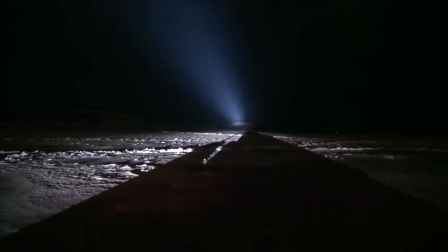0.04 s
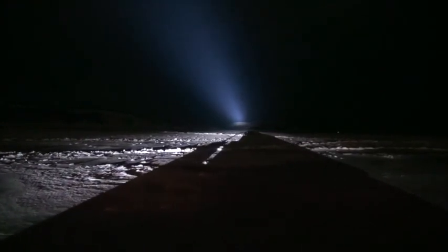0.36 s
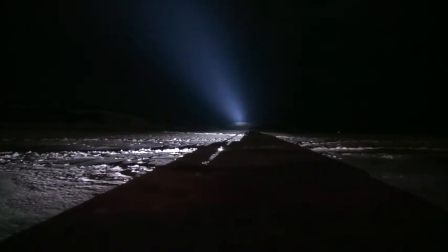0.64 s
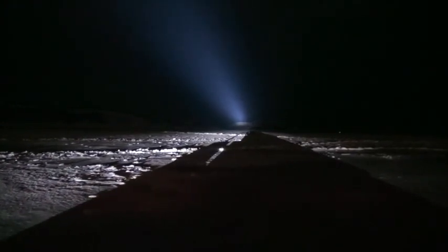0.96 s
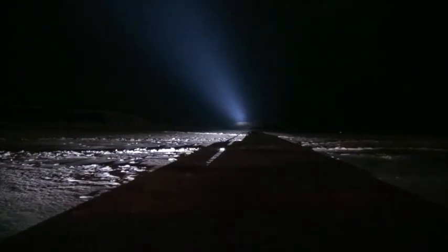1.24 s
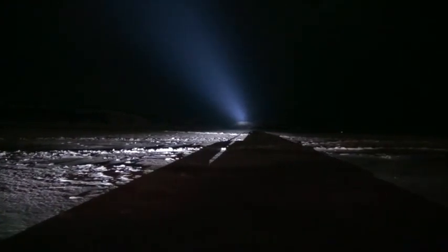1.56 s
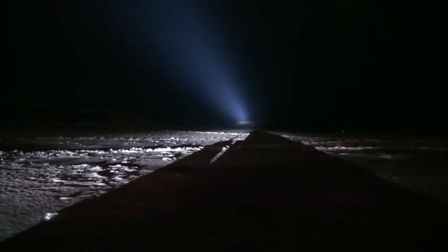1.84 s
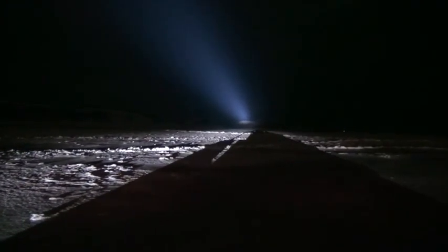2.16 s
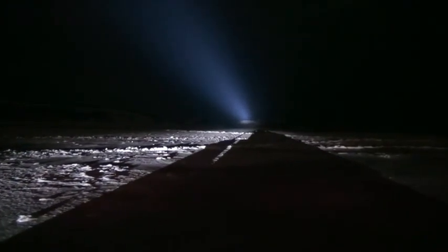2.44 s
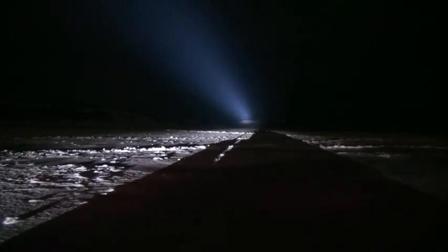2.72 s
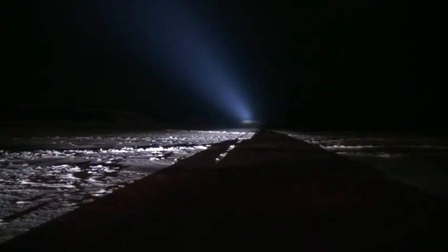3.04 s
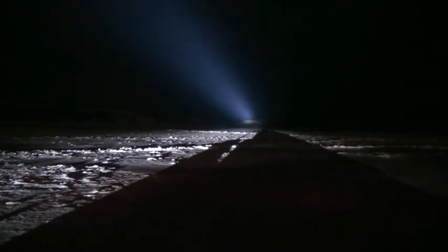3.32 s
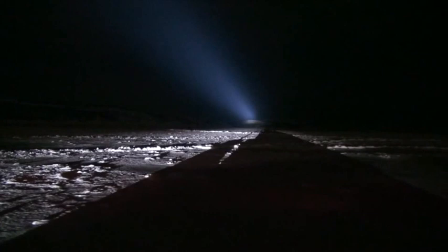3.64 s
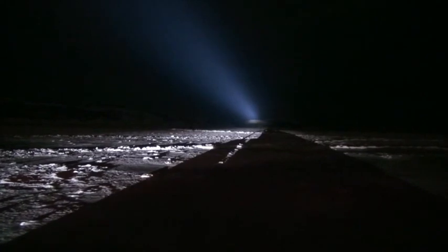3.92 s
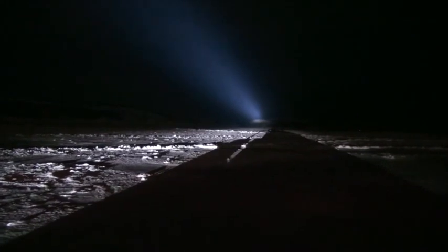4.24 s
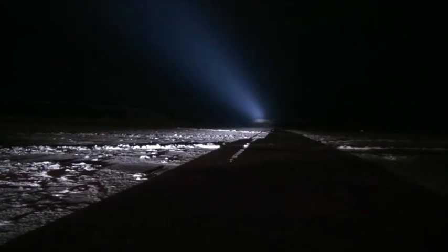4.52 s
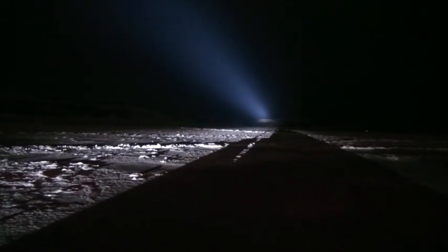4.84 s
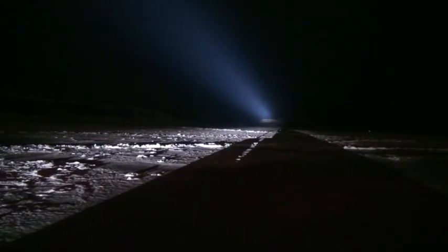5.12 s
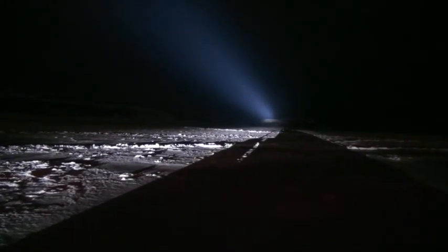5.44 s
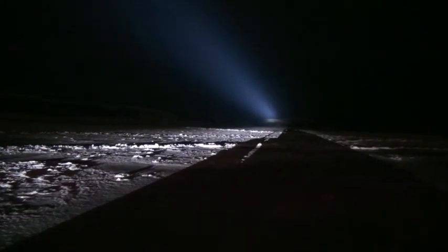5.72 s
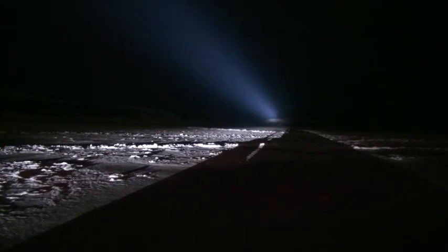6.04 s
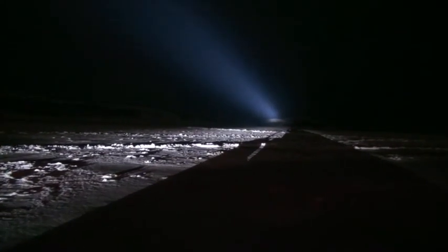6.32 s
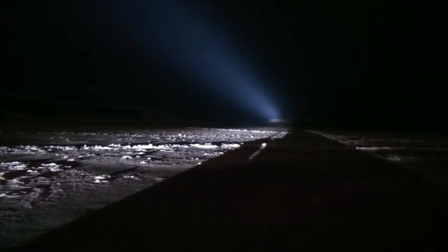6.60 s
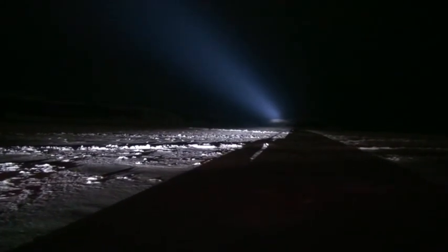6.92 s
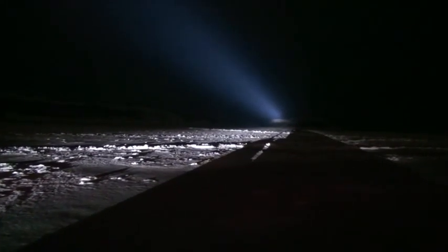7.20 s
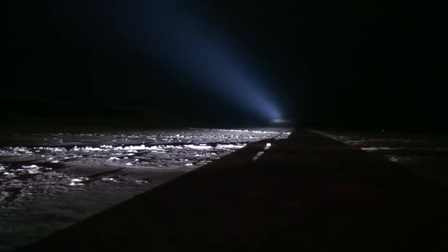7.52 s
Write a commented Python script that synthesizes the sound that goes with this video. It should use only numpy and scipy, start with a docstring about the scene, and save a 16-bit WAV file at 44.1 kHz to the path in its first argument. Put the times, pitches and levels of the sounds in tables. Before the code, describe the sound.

Sea ice grinds, crunches and fizzes against a tug's steel bow, over watery churning and a low, pulsing engine drone.

```python
"""Tug pushing through sea ice

On the front deck at night, the diesel engine hums and throbs about six times a second.
The hull rumbles, gulps and thuds as it rides over floes (slabs of floating ice).
The ice grinds and cracks, and slush hisses along the bow. Brief tones make the grinding bubbly.
The ice and rumble have a hollow colour, and the left side is quieter than the right."""
import sys
import numpy as np
from scipy import signal
from scipy.fft import rfft, irfft, next_fast_len
from scipy.io import wavfile
from scipy.ndimage import uniform_filter1d, minimum_filter1d, map_coordinates

SR = 44100
rng = np.random.default_rng(int(sys.argv[2]) if len(sys.argv) > 2 else 0)


def unload_wav(signal):
    """Save mono or channel-first audio to the path in sys.argv[1] as 16-bit WAV at rate SR, clipped to [-1, 1]."""
    wavfile.write(
        sys.argv[1],
        SR,
        np.round(np.clip(np.atleast_2d(signal).T, -1, 1) * 32767).astype(np.int16),
    )


N = 337806

# Levels in the tables are relative: the functions add their own gain and colour.
# the engine's hum swells with the load (time [s], level [dB])
ENGINE_LOAD = [(0, -27), (.8, -28.5), (3.6, -23), (4.1, -26), (5, -23), (7.66, -26)]
# tones of the exhaust (multiple of the engine's cycle rate, level [dB])
EXHAUST_TONES = [(13, -16.5), (21, 0.5), (22, -9.5), (23, 3), (24, -4.5), (25, -15)]
# deep shudders of the hull (time [s], pitch [Hz], level [dB])
SHUDDERS = [(2.37, 42.3, -26), (3.77, 29, -34)]
# gulps of air and water under the hull (time [s], pitch [Hz], level [dB])
GULPS = [(0.139, 92, -22), (0.28, 77, -20), (0.39, 77, -25), (0.75, 91, -14), (1.57, 96, -19),
         (2.01, 100, -22), (2.14, 82, -17), (2.35, 93, -14), (2.479, 90, -14), (2.56, 91, -22),
         (2.64, 88, -26), (2.77, 90, -25), (2.89, 88, -22), (3.1, 91, -22), (3.3, 94, -21),
         (3.439, 91, -17), (3.64, 82, -18), (3.822, 99, -17), (4.04, 92, -25), (4.14, 81, -18),
         (4.44, 77.5, -27), (4.54, 86, -13), (4.631, 98, -11), (4.751, 87, -18), (4.961, 96, -18),
         (5.15, 86.6, -15), (5.29, 91, -14), (5.55, 96, -23), (5.65, 87, -21), (5.969, 81.5, -19),
         (6.09, 97, -17), (6.73, 85, -19), (6.861, 86, -17), (7.151, 93, -12), (7.3, 84, -17),
         (7.41, 93, -18), (7.56, 88, -22)]
# water churning under the hull (time [s], level [dB])
CHURN = [(0, -34.5), (1.05, -39), (2.45, -33), (3, -39), (3.55, -37), (4.3, -40), (4.7, -34.5), (6, -33.5),
         (6.35, -41.5), (6.75, -33), (7.66, -36)]
# the rumble surges as the hull rides over a floe (start [s], length [s], level [dB])
SURGES = [(0.01, 0.088, -18), (0.185, 0.052, -15), (0.27, 0.042, -12.5), (0.321, 0.099, -19.0),
          (0.462, 0.068, -14), (0.555, 0.087, -12.5), (0.715, 0.18, -19.5), (0.917, 0.105, -16.5),
          (1.414, 0.11, -20.5), (1.536, 0.044, -13.5), (1.573, 0.012, -28), (1.848, 0.057, -19),
          (2.045, 0.12, -19), (2.336, 0.078, -11.5), (2.448, 0.021, -13.5), (2.539, 0.1, -14.5),
          (2.681, 0.1, -17.5), (2.849, 0.081, -21), (3.027, 0.062, -20), (3.185, 0.06, -21.5),
          (3.447, 0.057, -21), (3.63, 0.06, -15.5), (3.717, 0.26, -22.5), (4.012, 0.12, -17),
          (4.265, 0.13, -20.5), (4.418, 0.45, -23), (4.666, 0.065, -14.0), (4.728, 0.15, -18),
          (4.975, 0.074, -12), (5.09, 0.019, -12), (5.168, 0.049, -11), (5.248, 0.076, -21),
          (5.524, 0.087, -20), (5.935, 0.12, -14), (6.481, 0.069, -18.5), (6.662, 0.085, -18),
          (7.135, 0.041, -11), (7.213, 0.096, -16), (7.303, 0.03, -16.5), (7.35, 0.45, -19.5)]
# the bow runs free for a moment (time [s], level change [dB])
LULLS = [(.14, -0.5), (.25, -6.5), (1.16, 1.5), (1.915, -6.5), (2.21, -10.5), (2.32, -2.5), (3.35, -1),
         (4.14, -9), (4.21, 1.5), (4.635, -5.5), (5.465, -5.5), (5.8, -6), (6.2, -3.5), (6.3, -3),
         (7.011, -5)]
# floes bump the steel plates (time [s], thud level [dB], crunch level [dB])
BUMPS = [(.268, -14.5, -12.5), (.616, -13.5, -17), (1.527, -15, -7.5), (1.878, -20, -6),
         (2.239, -10, -13.5), (2.343, -14.5, -12), (2.475, -14.5, -10), (3.652, -20.5, -12),
         (4.268, -10.5, -22), (4.666, -12, -17), (5.497, -13.5, -12.5), (6.661, -17, -17),
         (7.152, -15, -12.5), (7.297, -10, -24)]
# tones the plates ring with (pitch [Hz], level [dB], time to fade by 60 dB [s])
PLATE_TONES = [(176.3, -17, 0.35), (212.6, -3, 0.17), (266, -4, 0.13), (292, -1, 0.092), (315, -1, 0.28),
               (368, -16, 0.072), (442.4, 7.5, 0.11)]
# single cracks in the ice (time [s], level [dB])
CRACKS = [(.294, -23), (.375, -21), (.668, -24), (.745, -23), (.846, -23), (1.156, -20), (1.358, -19),
          (1.526, -21), (1.872, -19), (2.014, -20.5), (2.178, -17), (2.63, -26), (3.359, -23), (3.397, -19),
          (3.795, -22.5), (4.124, -25), (4.333, -24), (4.65, -18), (5.15, -23), (5.661, -21), (6.04, -25),
          (6.355, -20), (6.425, -21), (6.84, -23), (7.134, -14), (7.267, -23), (7.606, -27)]
# how hard the bow presses into the ice (time [s], grinding level [dB])
PRESSURE = [(0, -29), (.7, -28.5), (.93, -28), (1.15, -29.5), (1.88, -27.5), (2.4, -29), (3.75, -29.5),
            (4.1, -29.5), (4.6, -28.5), (5.15, -28), (5.4, -31.5), (6.7, -30.5), (7.1, -28.5), (7.66, -32)]
# how much loose ice lies at the bow (time [s], slush level added to the pressure [dB])
LOOSE_ICE = [(0, -11), (.9, -10.5), (1.25, -8), (1.5, -7.5), (1.8, -10), (3.3, -9), (4.1, -9), (4.6, -9.5),
             (5.15, -9.5), (5.9, -8), (6.4, -6.3), (7.15, -8.5), (7.66, -6.5)]
# the colour, or balance of low and high, of each source (frequency [Hz], level [dB])
WATER_COLOUR = [(20, -37), (32, -26), (44, -18.5), (56, 2), (78, 0.5), (105, 3), (150, 2), (300, -57)]
HULL_COLOUR = [(60, -35), (110, -3.5), (160, 1), (230, 0.5), (320, 0), (450, -4), (560, -9), (660, -25),
               (800, -18), (2500, -61.5)]
SLUSH_COLOUR = [(1500, -18.5), (3300, 10), (4400, 8), (5500, 7.5), (7500, 5), (9000, 1.5), (10200, -2.5),
                (11000, -36)]
BRIEF_TONE_COLOUR = [(480, 4), (620, 4), (760, 3), (900, -1), (1150, -4.5), (1350, -4.5), (1600, -4),
                     (2000, -8.5), (2350, -10.5), (2900, -14.5), (3700, -21)]
GRIND_COLOUR = [(300, -22.5), (450, 2.5), (600, 3.5), (700, 6), (930, -1.5), (1130, -3), (1300, -6),
                (1650, -8), (2000, -10), (2350, -9.5), (2900, -16), (3500, -20.5), (4100, -18.5),
                (7000, -55)]
# passing dips that make the wash hollow (frequency [Hz], depth [dB]; negative is a lift)
HOLLOW_DIPS = [(540, 0.5), (610, 14.5), (690, 52), (810, 37), (870, 4), (950, -6.5), (1420, 1.5), (1510, 6),
               (1620, 24), (1730, 1), (1950, 12), (2150, -7.5), (3700, 7), (3950, 4.5), (4200, 1)]
# flicker of the wash in narrow bands (frequency [Hz], half of the deepest dip [dB])
FLICKER = [(430, 3), (560, 5.5), (1200, 2), (2800, 5), (4200, 3), (5500, 4)]
# fixed narrow peaks and dips give the ice and rumble a hollow colour (frequency [Hz], gain [dB])
HOLLOW_COLOUR = [(450, 0), (520, -1), (600, 1.5), (670, -2), (720, -3), (790, -5), (890, 1), (950, -1),
                 (1030, 1), (1160, -2.5), (1280, 1.5), (1540, -3), (1700, -2), (2000, -.5), (2300, 0),
                 (2385, 3), (2460, -.5), (2800, -2), (2900, 0), (3600, 1), (4030, -3), (4370, 2.5),
                 (4800, -1.5), (5100, 0)]
# the left side against the right (frequency [Hz], gain [dB])
LEFT_GAIN = [(60, -15), (140, -7), (230, -5.5), (330, -5.5), (430, -14), (500, -18), (555, -32),
             (600, -20.5), (670, -40.5), (790, -32), (870, -19.5), (980, -11.5), (1100, -21), (1270, -9),
             (1440, -14.5), (1540, -27), (1680, -16), (1830, -10), (1930, -21), (2080, -22.5),
             (2370, -21.5), (2530, -37), (2680, -7.5), (2790, -29.5), (2900, -26), (3050, -33), (3220, -29),
             (3480, -12), (3700, -16), (3930, -30), (4330, -14.5), (4700, -11.5), (5300, -9), (9800, -2.5)]
# how alike the two sides are (frequency [Hz], likeness [-1 to 1]; negative flips the wave)
LIKENESS = [(60, 0.95), (140, 0.81), (340, 0.79), (440, 0.57), (500, 0.31), (600, 0.94), (760, -0.33),
            (920, -0.55), (2400, -0.98), (2620, 0.86), (3450, 0.52), (3930, 0.87), (4300, 0.5), (9800, 0.5)]
# how far the left wave runs ahead (frequency [Hz], phase [radians])
LEFT_LEAD = [(4600, 0.053), (5500, 0.35), (7500, 0.55), (10000, 0.61)]
# slow drift of the left side (time [s], gain [dB])
LEFT_DRIFT = [(0, 1.7), (3.8, 2.5), (4.8, 1.5), (5.8, 1), (6.3, 1.5), (7.66, 1)]


def amp(db):
    """Turn decibels into a number to multiply by."""
    return 10 ** (np.asarray(db) / 20)


def unit(x):
    """Scale a sound to an average power of 1."""
    return x / np.sqrt(np.mean(x ** 2) + 1e-20)


def at_hz(table, hz):
    """Read between the rows of a frequency table, on a log scale."""
    freqs, values = np.transpose(table)
    return np.interp(np.log(hz + 1), np.log(freqs + 1), values)


def over_time(table):
    """Join the rows of a time table with straight lines, one value per sample."""
    return np.interp(np.arange(N) / SR, *np.transpose(table))


def noise():
    """Two unrelated white noises."""
    return rng.standard_normal((2, N))


def wobble(rate):
    """A smooth curve through `rate` random values a second."""
    return map_coordinates(rng.standard_normal(4096), [np.arange(N) * rate / SR], mode="wrap")


def patches(shape, bands, frames):
    """A random map, smoothed across frequency bands and time frames."""
    field = uniform_filter1d(rng.standard_normal(shape), bands, axis=0)
    return unit(uniform_filter1d(field, frames, axis=1))


def filtered(x, response):
    """Multiply each frequency in a sound by response(hz)."""
    size = next_fast_len(N + SR // 2)
    return irfft(rfft(x, size) * response(np.fft.rfftfreq(size, 1 / SR)), size)[..., :N]


def coloured(x, colour):
    """Give a sound the colour in a table, at an average power of 1."""
    return unit(filtered(x, lambda hz: amp(at_hz(colour, hz))))


def add(track, start_s, sound):
    """Mix a short sound into a track."""
    room = track[:, max(round(start_s * SR), 0):][:, :sound.shape[-1]]
    room += sound[..., :room.shape[-1]]


def fractures(per_s, spread_db):
    """Tiny breaks in the ice: clicks of random size at random times."""
    happens = rng.random(N) < per_s / SR
    size = amp(spread_db * np.clip(rng.standard_normal(N), -2, 2))
    return unit(happens * size * noise())


def brittle(x, body_db):
    """Colour a sound like snapping ice: a bright edge over a gritty body."""
    return filtered(x, lambda hz: np.hypot(amp(at_hz(SLUSH_COLOUR, hz)),
                                           amp(body_db + at_hz(GRIND_COLOUR, hz))))


def diesel(cycle_hz=6.157, speed_wander=0.0024, first_throb_s=0.111, phase_scatter=0.34):
    """Exhaust tones follow the turning engine; close ones line up into a throb once a cycle."""
    speed = 1 + speed_wander * wobble(4.11)
    angle = 2 * np.pi * cycle_hz * (np.cumsum(speed) / SR - first_throb_s)
    hum = np.zeros(N)
    for multiple, db in EXHAUST_TONES:
        strength = amp(db + 2.6 * wobble(3.5))
        hum += strength * np.sin(multiple * angle + phase_scatter * rng.standard_normal())
    return np.sqrt(2) * amp(over_time(ENGINE_LOAD)) * hum * amp([[-6], [0]])  # quieter on the left


def shudders(half_length_s=0.052):
    """The whole hull flexes for a few slow swings."""
    flex, t = np.zeros(N), np.arange(N) / SR
    for s, hz, db in SHUDDERS:
        swell = np.exp(-((t - s) / half_length_s) ** 2)
        flex += amp(db) * swell * np.sin(2 * np.pi * hz * (t - s))
    return flex * amp([[-7], [0]])


def gulps(half_length_s=0.023):
    """Air trapped under the floes escapes in deep, soft gulps."""
    track, t = np.zeros((1, N)), np.arange(-SR // 8, SR // 8) / SR
    swell = np.exp(-(t / half_length_s) ** 2)
    for s, hz, db in GULPS:
        add(track, s + t[0], amp(db) * swell * np.sin(2 * np.pi * (hz * t + rng.random())))
    return track * amp([[-7], [0]])


def lulls(half_length_s=0.016):
    """Brief level changes in dB, nearly all dips, as the bow runs free between floes."""
    t = np.arange(N) / SR
    return sum(db * np.exp(-((t - s) / half_length_s) ** 2) for s, db in LULLS)


def surges(resting_db=-20, rise_s=0.0068, release_s=0.016):
    """The rumble's relative level in dB: each floe adds a surge that rises, holds and lets go."""
    t = np.arange(N) / SR
    power = amp(resting_db) ** 2
    for s, length, db in SURGES:
        rise = 1 + (t - s) / rise_s
        fall = 1 - (t - s - length) / release_s
        power += (amp(db) * np.clip(np.minimum(rise, fall), 0, 1)) ** 2
    return 10 * np.log10(power) + 0.2 * wobble(13)  # the hull also lurches a little


def hull(rumble_db):
    """Broken ice knocks on the steel plates in a dull rumble, over churning water."""
    knocks = noise() + 0.5 * fractures(per_s=400, spread_db=1)
    rumble = amp(rumble_db + 4) * coloured(knocks, HULL_COLOUR)
    churn = amp(over_time(CHURN) + 9) * coloured(noise(), WATER_COLOUR)
    return rumble + churn


def bumps(rise_s=0.0022, crunch_fade_s=0.15, pitch_scatter=0.045):
    """Large floes thud on the plates, each at a slightly different spot, and crunch at their edges."""
    thuds, crunch, t = np.zeros((2, N)), np.zeros((1, N)), np.arange(SR // 3) / SR
    for s, thud_db, crunch_db in BUMPS:
        ring = 0
        for hz, db, fade_s in PLATE_TONES:
            fade = amp(db + rng.normal(0, 1.6) - 60 * t / fade_s)
            pitch = hz * (1 + pitch_scatter * rng.standard_normal())
            ring += fade * np.sin(2 * np.pi * (pitch * t + rng.random((2, 1))))
        add(thuds, s, amp(thud_db - 2) * (1 - np.exp(-t / rise_s)) * ring)
        add(crunch, s, amp(crunch_db - 8 - 60 * t / crunch_fade_s))
    return thuds + crunch * coloured(noise(), GRIND_COLOUR)


def cracks(fade_s=0.031, rise_s=0.00054):
    """Ice splits with short, sharp bursts of noise."""
    track, t = np.zeros((2, N)), np.arange(SR // 10) / SR
    burst = amp(-60 * t / fade_s) * (1 - np.exp(-t / rise_s))
    for s, db in CRACKS:
        add(track, s, amp(db - 6) * burst * rng.standard_normal((2, len(t))))
    return brittle(track, body_db=0)


def splinters(per_s=60, fade_s=0.054, rise_s=0.003, spread_db=4.5):
    """Small splinters of ice snap at random, each a brief gritty burst."""
    happens = rng.random(N) < per_s / SR
    size = amp(spread_db * np.clip(rng.standard_normal(N), -2, 1.5))
    t = np.arange(SR // 10) / SR
    burst = amp(-60 * t / fade_s) * (1 - np.exp(-t / rise_s))
    loudness = signal.fftconvolve(happens * size, burst)[:N]  # one burst for each snap
    return unit(brittle(loudness * noise(), body_db=3))


def slush(slush_db):
    """Snow and loose ice fizz along the bow wave, with splinters snapping in it."""
    flutter = amp(0.95 * wobble(80))
    fizz = flutter * (noise() + 0.5 * fractures(per_s=1800, spread_db=10))
    return amp(slush_db + 4.5) * (coloured(fizz, SLUSH_COLOUR) + amp(-11) * splinters())


def brief_tones(grind_db, per_s=470, low_hz=478.7, high_hz=3709, mean_hold_s=0.045):
    """Brief tones at random pitches flicker through the grinding and make it sound bubbly."""
    track, t = np.zeros((2, N)), np.arange(SR // 8) / SR
    rise_s, release_s, spread_db = 0.0012, 0.013, 2
    for when, pitch, phase_a, phase_b, life, size in rng.random((int(per_s * N / SR), 6)):
        hz = low_hz + pitch * (high_hz - low_hz)
        tone = np.sin(2 * np.pi * (hz * t + [[phase_a], [phase_b]]))
        fall = 1 + (2 * life * mean_hold_s - t) / release_s
        shape = np.clip(np.minimum(t / rise_s, fall), 0, 1)
        add(track, when * N / SR, amp(spread_db * (2 * size - 1)) * shape * tone)
    return amp(grind_db + 8) * coloured(track, BRIEF_TONE_COLOUR)


def grinding(grind_db):
    """Floes crush and scrape each other in a dense stream of tiny breaks."""
    crush = noise() + 0.45 * fractures(per_s=1500, spread_db=4.5)
    return amp(grind_db + 8.5) * coloured(crush, GRIND_COLOUR)


def watery(x):
    """Wide and narrow frequency bands sink and return, which sounds hollow and watery."""
    hz, _, bands = signal.stft(x, SR, nperseg=2048)
    wide_dips = np.clip(4 * patches(bands.shape[1:], bands=8, frames=3), -1, 0)
    narrow_dips = np.clip(4 * patches(bands.shape[1:], bands=2, frames=3), -2, 0)
    gain = amp(at_hz(HOLLOW_DIPS, hz)[:, None] * wide_dips + at_hz(FLICKER, hz)[:, None] * narrow_dips)
    gain /= np.sqrt(np.mean(gain ** 2, axis=1, keepdims=True))  # each band keeps its average power
    return signal.istft(bands * gain, nperseg=2048)[1][:, :N]


def quieter_left(pair):
    """The left side is quieter, deeply notched in the middle range and partly unlike the right."""
    def left_mix(hz):
        alike = at_hz(LIKENESS, hz)
        shared = alike * np.exp(1j * at_hz(LEFT_LEAD, hz))
        separate = np.sqrt(1 - alike ** 2)
        return amp(at_hz(LEFT_GAIN, hz)) * np.array([shared, separate])

    left = filtered(pair, left_mix).sum(axis=0)
    return np.array([left * amp(over_time(LEFT_DRIFT)), pair[0]])


def scene():
    """Engine, hull and ice as heard on deck."""
    lull_db = lulls()
    pressure_db = over_time(PRESSURE) + 0.26 * wobble(10)  # the ice gives way unevenly
    grind_db = pressure_db + 0.1 * lull_db
    ice = grinding(grind_db) + slush(pressure_db + over_time(LOOSE_ICE))
    below_deck = diesel() + gulps() + shudders()
    wash = watery(hull(surges() + lull_db) + ice + brief_tones(grind_db))
    bow = wash + cracks() + bumps()
    hollow_bow = filtered(bow, lambda hz: amp(at_hz(HOLLOW_COLOUR, hz)))
    return quieter_left(hollow_bow) + below_deck


def record(dry, loud_db=-9.5, cut_per_db=0.52, reaction_s=0.026, peak_limit=0.96, top_hz=10550):
    """Turn loud surges down a little, hold peaks under full scale and cut the highest treble."""
    right_power = uniform_filter1d(dry[1] ** 2, size=int(reaction_s * SR))
    level_db = 10 * np.log10(np.abs(right_power) + 1e-12)
    softened = dry * amp(-cut_per_db * np.maximum(level_db - loud_db, 0))
    needed_gain = 1 / np.maximum(np.abs(softened).max(axis=0) / peak_limit, 1)
    smooth_gain = uniform_filter1d(minimum_filter1d(needed_gain, size=400), size=300)
    return filtered(softened * smooth_gain, lambda hz: 1 / np.sqrt(1 + (hz / top_hz) ** 160))


dry = scene()
out = record(dry)
unload_wav(out)
```